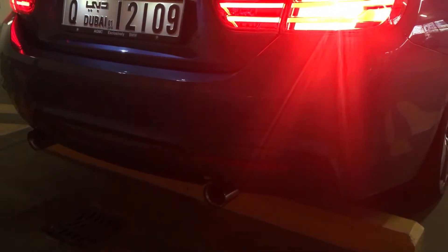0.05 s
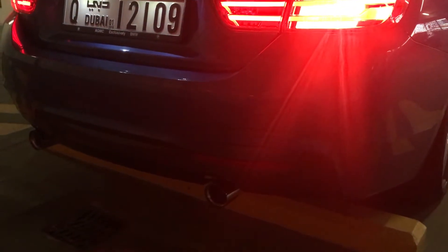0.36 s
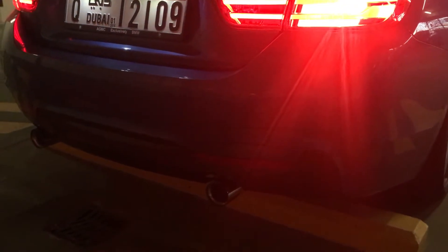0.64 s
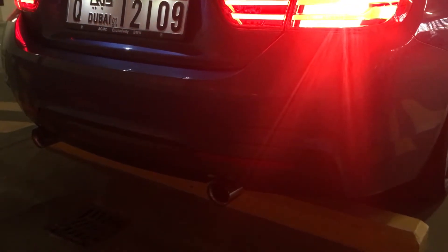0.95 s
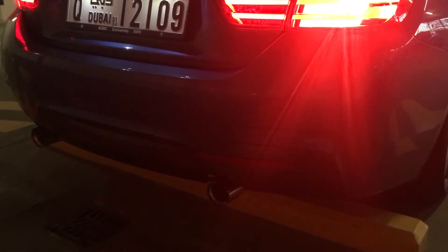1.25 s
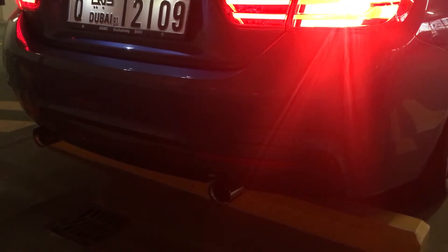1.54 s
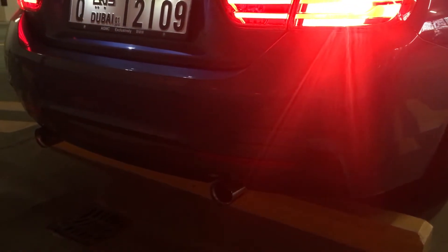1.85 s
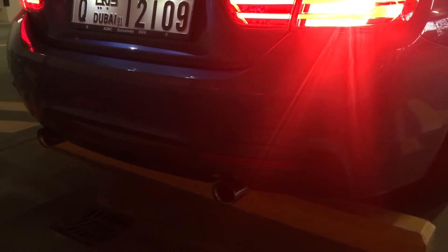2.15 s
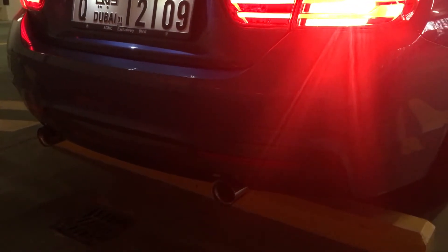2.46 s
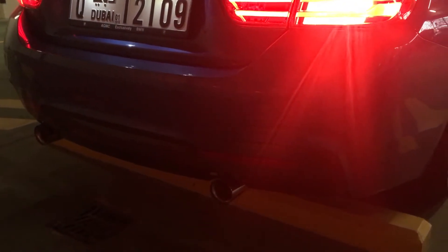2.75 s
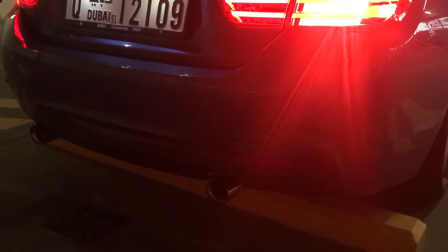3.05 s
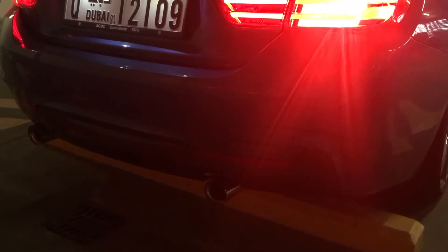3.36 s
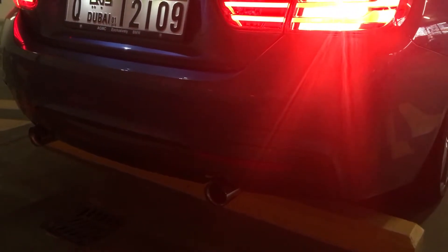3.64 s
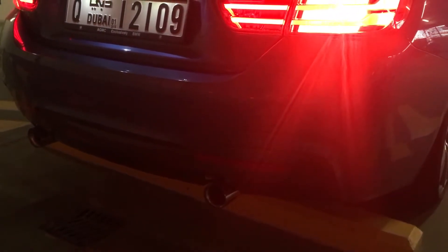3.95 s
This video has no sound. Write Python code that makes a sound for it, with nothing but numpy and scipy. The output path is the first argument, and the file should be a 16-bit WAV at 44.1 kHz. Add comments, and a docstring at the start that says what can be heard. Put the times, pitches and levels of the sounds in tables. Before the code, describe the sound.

A car idles outdoors for all four seconds, its exhaust heard close from behind as a low, loping throb with burble, drone and soft hiss over a faint rumble. The pipe hums more strongly from about 0.2 to 0.8 seconds. The metal tip gives light, tinny rattles, the clearest at 2 seconds. Hot metal ticks faintly near 2.9 seconds and at the very end. The engine speed barely changes.

```python
"""A low, loping throb: a six-cylinder car idles outdoors, heard from a step behind its tailpipes.
Each firing pushes out a low boom and a sharp blow that rings the exhaust pipe.
The six cylinders differ in strength, so the beat limps. Swirling gas, a round burble,
a tinny rasp and a hiss follow every firing. Behind them the pipe hums, the silencer drones
and hot metal ticks twice, over a faint rumble."""
import sys
import numpy as np
from scipy import signal
from scipy.fft import rfft, irfft
from scipy.io import wavfile
from scipy.ndimage import uniform_filter1d

SR = 44100
rng = np.random.default_rng(int(sys.argv[2]) if len(sys.argv) > 2 else 0)


def pcm_store(signal):
    """Save signal as 16-bit PCM."""
    levels = np.round(np.clip(np.atleast_2d(signal), -1, 1) * 32767)
    wavfile.write(sys.argv[1], SR, levels.astype(np.int16).T)


N = 176400  # 4 seconds

# how often the engine fires: time_s, rate_hz
FIRING_RATE = [(0, 64.97), (.35, 65.27), (.7, 64.7), (1, 64.08), (1.3, 63.92), (1.6, 63.44), (2, 63.49),
               (2.4, 64.05), (2.8, 63.71), (3.05, 64.33), (3.3, 64.4), (3.6, 63.43), (4, 62.11)]
# each cylinder in firing order: lag_ms, blow_db, echo_delay_ms, echo_db, gas_db, rasp_db
CYLINDERS = [(.15, -3, 1.3, -14, 0, 0), (.1, -11, .8, -5, -1, 0), (.3, 0, 1.25, -6, -1, -1),
             (.15, -6, 1.15, -5, 1.5, 1), (.1, -9, 1.0, -11, 1, 3.5), (.15, -1, 1.3, -6, 1, 0)]
# firings that blow harder than the rest: time_s, extra_db
HARD_FIRINGS = [(.172, 2), (.218, 2), (.402, 3.5), (.541, 2), (.587, 2.5), (.773, 2), (1.333, 2),
                (2.372, 2), (2.42, 2), (2.607, 2), (3.735, 3), (3.798, 3), (3.83, 2), (3.924, 4.5)]
# firings that rattle the metal tip: time_s, extra_db
TIP_RATTLES = [(.35, 6), (.698, 7.5), (.805, 5), (1.182, 7.5), (1.65, 6), (1.728, 6), (2.027, 15.5),
               (2.216, 7), (2.498, 2), (3.325, 3), (3.527, 7.5)]
# ticks of hot metal: start_s, pitch_hz, start_level_db
METAL_TICKS = [(2.862, 5260, -39), (3.974, 8800, -43)]
# tones in the silencer: waves_per_engine_cycle, resonance_hz, width_hz, level_on_resonance_db
SILENCER_TONES = [(10, 107, 30, -40), (15, 160, 30, -38), (30, 321, 30, -33), (32, 348, 11, -27.5),
                  (38, 405, 30, -37), (42, 451, 6, -32), (48, 512, 30, -34)]
# the boom's higher tones: waves_per_firing, level_db
BOOM_OVERTONES = [(2, -21.5), (3, -26.5), (4, -34)]
# echoes from the road and the bumper: delay_s, gain_db
NEARBY_ECHOES = [(.0043, -13.5), (.0071, -13), (.0126, -13)]

# how loud the hum, hiss, deepest boom tone and blows are over time: time_s, level_db
HUM_LEVEL = [(0, -36), (.17, -28.5), (.4, -26.5), (.75, -26.5), (.93, -39), (3.7, -39), (4, -33)]
HISS_LEVEL = [(0, -45), (.7, -44), (2, -43.5), (3.2, -43), (4, -42)]
BASS_LEVEL = [(0, -19), (.3, -26.5), (.7, -23), (1.3, -21.5), (2.2, -21), (2.6, -24), (3.1, -27),
              (3.55, -29), (3.8, -24.5), (4, -23.5)]
BLOW_LEVEL = [(0, -22.8), (.4, -21), (.8, -21.6), (1.2, -22.6), (3.5, -22.6), (3.8, -21.2), (4, -21.4)]

# each sound's colour, its balance from low to high: frequency_hz, gain_db
RUMBLE_COLOUR = [(15, -16), (30, -9), (52, 0), (85, -2), (130, -6), (210, -18), (600, -30), (2000, -45)]
HISS_COLOUR = [(500, 2.5), (2600, 4.5), (3200, 1), (3600, 2.5), (4600, -1.5), (5700, 0), (6100, -2),
               (6600, 0.5), (7700, -4), (8700, -4.5), (10300, -13.5), (12000, -13.5), (15500, -34)]
RASP_COLOUR = [(600, -33), (1500, -16.5), (1800, -12), (2050, -2), (2300, -8), (2500, -18), (3300, -26),
               (4500, -53), (9000, -70)]
BURBLE_COLOUR = [(30, -35), (120, -2), (220, -4.5), (330, -6), (480, -3), (570, -4), (680, -6), (800, -7),
                 (1000, -11), (1500, -23), (4000, -68.5)]
GAS_COLOUR = [(30, -44), (100, -14), (220, -3.5), (340, -18), (480, -9), (570, -10), (680, -2), (830, -2),
              (1000, -2), (1300, -9), (1550, -15), (2500, -31), (6000, -52.5)]
BLOW_COLOUR = [(30, -67), (130, -26), (230, -8.5), (290, -7), (450, -12), (565, -4.5), (660, 0.5),
               (930, -5), (1240, -12.5), (1550, -27), (2500, -38.5), (6000, -75)]

# where the tip rings (for hiss and rasp) and where the pipe rings: pitch_hz, width_hz, boost_db
TIP_HISS_RESONANCES = [(3210, 110, 3), (6500, 310, 1.5)]
TIP_RASP_RESONANCES = [(1680, 15, 29), (1948, 51, 29), (2045, 41, 16.5), (2123, 20, 27.5), (2281, 59, 23.5),
                       (3070, 30, 34), (3270, 54, 33.5)]
PIPE_RESONANCES = [(341, 50, 15), (394, 22, 11), (452, 14, 9), (484, 20, 11), (516, 22, 13), (614, 14, 16),
                   (676, 24, 12), (710, 26, 13), (792, 22, 13.5), (858, 20, 6), (908, 26, 8.5),
                   (973, 16, 7.5), (1045, 20, 6), (1090, 24, 8.5), (1166, 20, 11.5), (1285, 24, 7),
                   (1354, 40, 11)]


def gain(db):
    """Turn decibels into a number to multiply by."""
    return 10 ** (np.asarray(db) / 20)


def set_level(sound, db):
    """Scale a sound from its average (rms) level to the given one."""
    return sound * gain(db) / np.sqrt(np.mean(sound ** 2))


def curve(rows):
    """Join (time_s, value) rows with straight lines."""
    return np.interp(np.arange(N) / SR, *np.array(rows).T)


def wander(rate_hz):
    """A smooth random drift, mostly between -1 and 1."""
    hold = int(SR / rate_hz)
    steps = np.repeat(rng.standard_normal(N // hold + 1), hold)
    return 1.3 * uniform_filter1d(uniform_filter1d(steps, hold), hold)[:N]


def ring(sound, colour, resonances=(), size=16384):
    """Pass a sound through a body that colours it and rings at its resonances, its favourite pitches."""
    hz = np.maximum(np.arange(size // 2 + 1) * SR / size, 1)
    colour_hz, colour_db = np.array(colour).T
    broad_db = np.interp(np.log(hz), np.log(colour_hz), colour_db)
    boost = sum((gain(db) ** 2 - 1) / (1 + (2 * (hz - pitch) / width) ** 2)
                for pitch, width, db in resonances)
    cepstrum = irfft(np.log(gain(broad_db)) + .5 * np.log(np.maximum(1 + boost, .1)))
    # fold it so the ringing comes after each hit, never before
    cepstrum[1:size // 2] *= 2
    cepstrum[size // 2 + 1:] = 0
    ringing = irfft(np.exp(rfft(cepstrum)))
    return signal.fftconvolve(sound, ringing)[:N]


def pulses(times, sizes):
    """One click at each time, shared between two neighbouring samples."""
    position = np.clip(times * SR, 0, N)
    sample = position.astype(int)
    before = np.bincount(sample, sizes * (1 - position + sample), N + 2)
    after = np.bincount(sample + 1, sizes * (position - sample), N + 2)
    return (before + after)[:N]


def puffs(times, db, rise_s, fall_s, steady, scatter_db):
    """The noise of swirling gas: it surges at each given time, above a steady flow."""
    t = np.arange(SR // 20) / SR
    shape = (1 - np.exp(-t / rise_s)) * np.exp(-t / fall_s)
    sizes = gain(db + scatter_db * rng.standard_normal(len(times)))
    surges = signal.fftconvolve(pulses(times, sizes), shape / shape.max())[:N]
    return (steady + surges) * rng.standard_normal(N)


def accents(times, rows):
    """Extra decibels for the firing nearest to each (time_s, extra_db) row."""
    firing = np.arange(len(times))
    return sum(db * (firing == np.argmin(abs(times - time_s))) for time_s, db in rows)


def rumble():
    """Faint, deep, steady noise in the background."""
    return set_level(ring(rng.standard_normal(N), RUMBLE_COLOUR), db=-34.5)


def metal_ticks(fade_s=.007, width_hz=490):
    """Hot metal gives tiny snaps, each a narrow band of noise that dies quickly."""
    t = np.arange(N) / SR
    ticks = 0
    for start_s, hz, db in METAL_TICKS:
        band = signal.lfilter(*signal.iirpeak(hz, hz / width_hz, fs=SR), rng.standard_normal(N))
        fade = (t > start_s) * np.exp(-abs(t - start_s) / fade_s)
        ticks += fade * set_level(band, db)
    return ticks


def silencer_drone(firings_done, waver_db=2, waver_rad=.45):
    """Tones follow the six-cylinder cycle; each swells as it drifts onto its silencer resonance."""
    cycle_angle = 2 * np.pi * firings_done / len(CYLINDERS)
    cycle_hz = curve(FIRING_RATE) / len(CYLINDERS)
    drone = 0
    for multiple, resonance_hz, width_hz, db in SILENCER_TONES:
        off_tune = 2 * (multiple * cycle_hz - resonance_hz) / width_hz
        response = gain(db + waver_db * wander(8.99)) / (1 + 1j * off_tune)
        phase = multiple * cycle_angle + waver_rad * wander(9) + 2 * np.pi * rng.random()
        drone += np.real(response * np.exp(1j * phase))
    return np.sqrt(2) * drone


def pipe_hum(firings_done, waves_per_firing=6, waver_db=2, waver_rad=.45):
    """One overtone of the firings hums in the pipe, loudest early on, when the idle runs high."""
    db = curve(HUM_LEVEL) + waver_db * wander(16)
    phase = 2 * np.pi * waves_per_firing * firings_done + waver_rad * wander(15)
    return np.sqrt(2) * gain(db) * np.cos(phase)


def tailpipe_tip(times, rasp_db, hiss_lag_s=.0013):
    """Each puff rasps in the metal tip, then hisses out into the air."""
    inside = puffs(times, rasp_db, rise_s=.00064, fall_s=.0015, steady=.27, scatter_db=1.8)
    outside = puffs(times + hiss_lag_s, db=0, rise_s=.0011, fall_s=.0087, steady=1, scatter_db=3)
    rasp = set_level(ring(inside, RASP_COLOUR, TIP_RASP_RESONANCES), db=-39.5)
    hiss = set_level(ring(outside, HISS_COLOUR, TIP_HISS_RESONANCES), curve(HISS_LEVEL))
    return rasp + hiss


def gas_bursts(times, gas_db):
    """Each firing sends a burst of swirling gas that rings the pipe."""
    gas = puffs(times, gas_db, rise_s=.0008, fall_s=.0032, steady=.22, scatter_db=1.6)
    return set_level(ring(gas, GAS_COLOUR, PIPE_RESONANCES), db=-26.8)


def silencer_burble(times, blow_db, lag_s=.005):
    """Each blow churns the gas in the silencer; its late, round answer fills the gaps in the beat."""
    churn = puffs(times + lag_s, .5 * blow_db, rise_s=.002, fall_s=.006, steady=.6, scatter_db=1.5)
    return set_level(ring(churn, BURBLE_COLOUR, PIPE_RESONANCES), db=-25.5)


def boom(firings_done, lag_s=.0041, waver_db=1.2, waver_rad=.13, waver_hz=32):
    """The smooth swell of pressure from each firing: a few low, wavering tones that peak together."""
    angle = 2 * np.pi * (firings_done - lag_s * curve(FIRING_RATE))
    tones = 0
    for multiple, db in [(1, curve(BASS_LEVEL))] + BOOM_OVERTONES:
        strength = gain(db + waver_db * wander(waver_hz))
        tones += strength * np.cos(multiple * angle + waver_rad * wander(waver_hz))
    return np.sqrt(2) * tones


def exhaust_blows(times, blow_db, echo_s, echo_db, scatter_db=.7):
    """Sharp blows ring the pipe; each echoes in the manifold, where the cylinders' pipes join."""
    blow_scatter, echo_scatter = scatter_db * rng.standard_normal((len(times), 2)).T
    blow_sizes, echo_sizes = gain(blow_db + blow_scatter), gain(echo_db + echo_scatter)
    blows = 0
    for delay_s, db in [(0, 0)] + NEARBY_ECHOES:  # the direct path, then off the road and bumper
        arrivals = times + delay_s
        blows += gain(db) * (pulses(arrivals, blow_sizes) + pulses(arrivals + echo_s, echo_sizes))
    return set_level(ring(-blows, BLOW_COLOUR, PIPE_RESONANCES), curve(BLOW_LEVEL))


def scene(jitter_ms=.13, first_firing_s=.0036):
    """The engine's speed sets when it fires, and the cylinders take turns."""
    rate_hz = curve(FIRING_RATE)
    firings_done = np.cumsum(rate_hz) / SR - first_firing_s * rate_hz[0]  # climbs by 1 per firing
    firing = np.arange(int(firings_done[-1]) + 1)
    cylinder = firing % len(CYLINDERS)
    lag_ms, blow_db, echo_ms, echo_db, gas_db, rasp_db = np.array(CYLINDERS)[cylinder].T
    on_beat_s = np.interp(firing, firings_done, np.arange(N) / SR)
    times = on_beat_s + (lag_ms + jitter_ms * rng.standard_normal(len(firing))) / 1000
    hard_db = accents(times, HARD_FIRINGS)

    background = rumble()
    blows = exhaust_blows(times, blow_db + hard_db, echo_ms / 1000, echo_db + hard_db)
    gas = gas_bursts(times, gas_db) + silencer_burble(times, blow_db)
    tip = tailpipe_tip(times, rasp_db + accents(times, TIP_RATTLES))
    tones = boom(firings_done) + silencer_drone(firings_done) + pipe_hum(firings_done)
    return (background + metal_ticks() + tip + gas + tones + blows)[None]


def record(dry, top_hz=15600, fade_s=.002):
    """Fade both ends so they do not click, and cut the highest treble."""
    fades = curve([(0, 0), (fade_s, 1), (N / SR - fade_s, 1), (N / SR, 0)])
    treble_cut = signal.ellip(12, .1, 90, top_hz, fs=SR, output="sos")
    return signal.sosfilt(treble_cut, dry * fades)


dry = scene()
out = record(dry)
pcm_store(out)
```